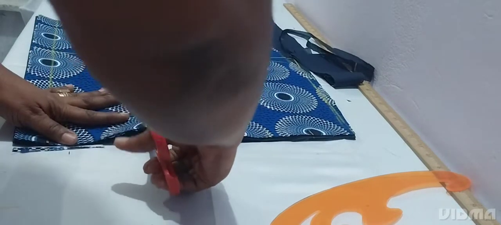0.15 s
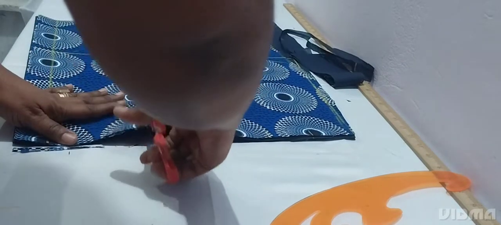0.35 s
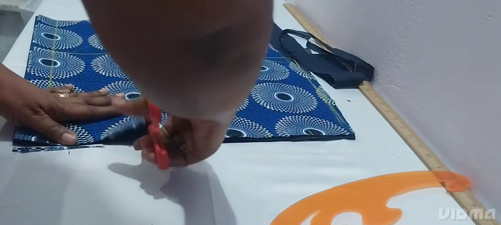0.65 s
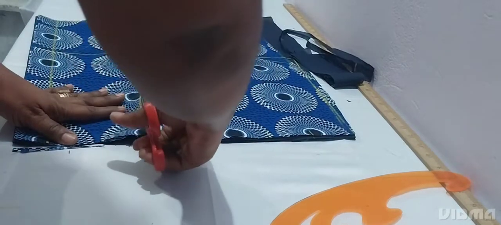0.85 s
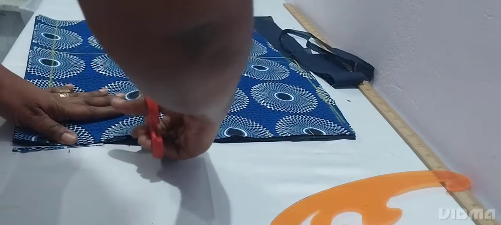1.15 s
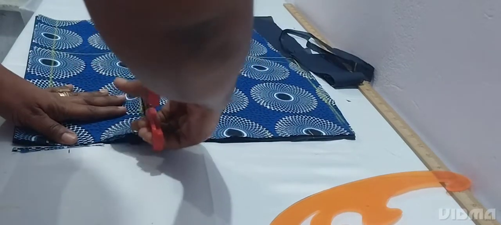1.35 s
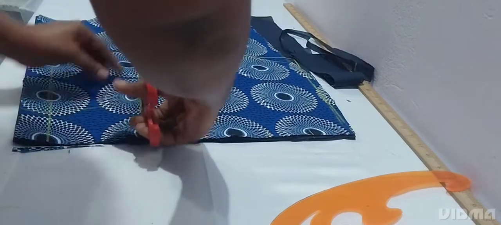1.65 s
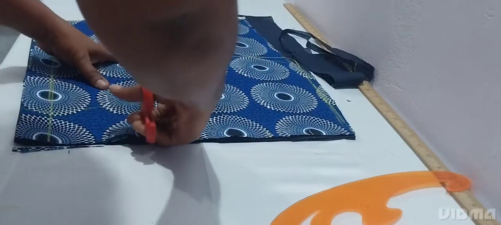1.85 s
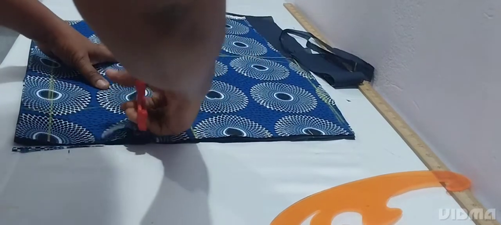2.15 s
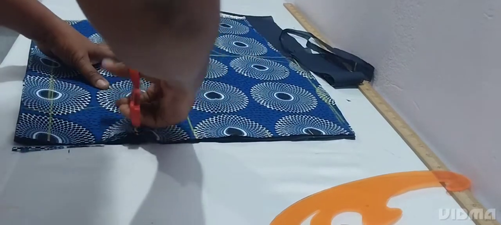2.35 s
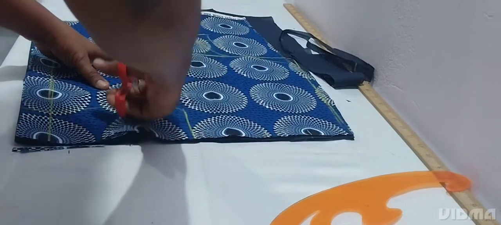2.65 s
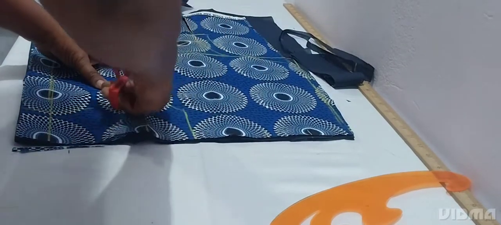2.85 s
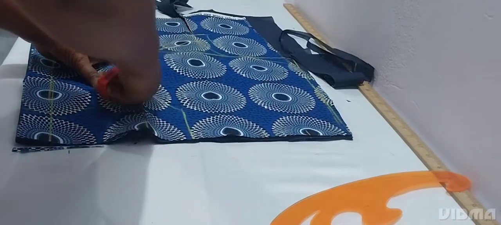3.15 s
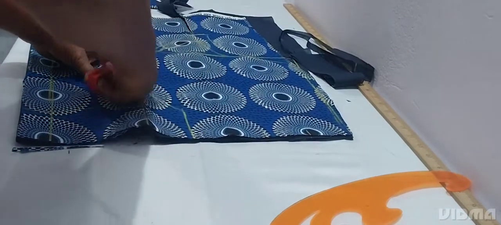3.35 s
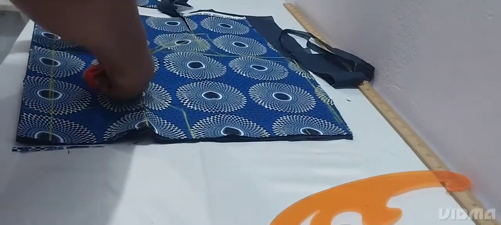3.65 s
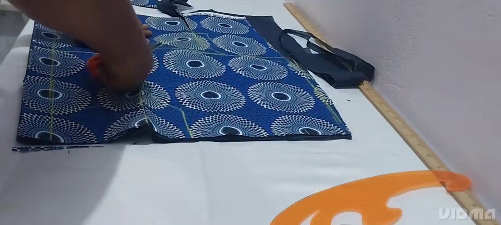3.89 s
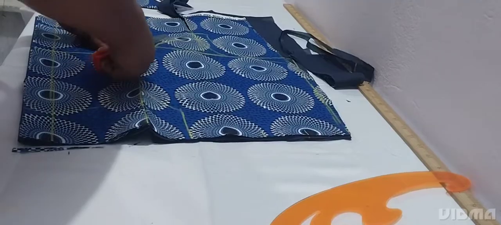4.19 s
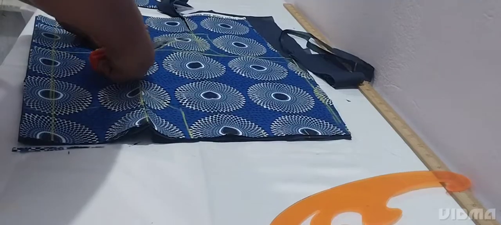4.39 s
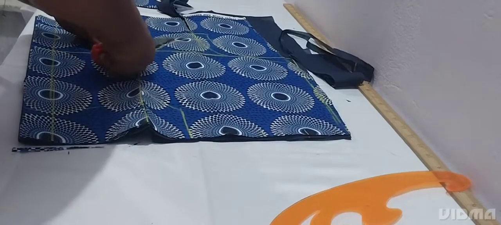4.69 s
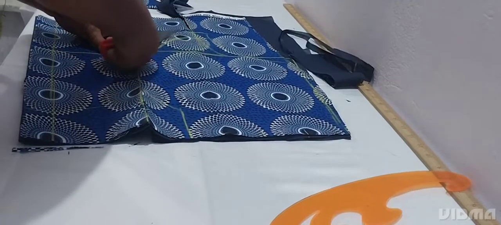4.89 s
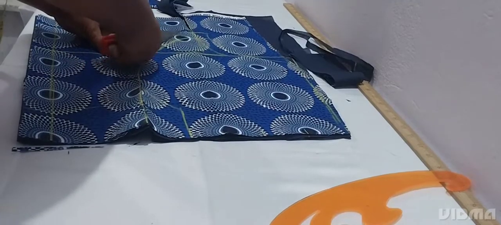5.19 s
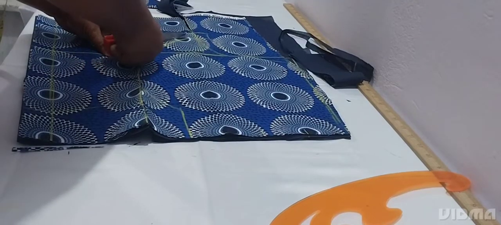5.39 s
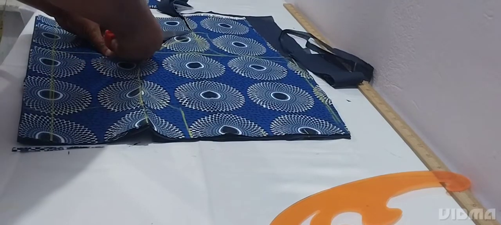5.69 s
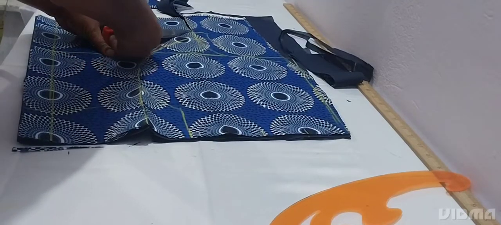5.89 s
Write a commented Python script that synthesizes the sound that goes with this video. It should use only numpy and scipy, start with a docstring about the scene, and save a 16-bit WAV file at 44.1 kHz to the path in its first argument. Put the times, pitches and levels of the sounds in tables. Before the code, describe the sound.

A cut is already closing at 0 s, then large scissors keep snipping through layered cotton roughly every 0.35 seconds, eighteen strokes up to about 5.9 s. Each lasts well under a tenth of a second: a dense crackle of snapping threads, a metallic rasp, and a hollow wooden rattle from the table under the lower blade. Many end in a hard steel clack, doubled around 0.67, 1.0 and 2.02 s. Low soft thuds of the hand and a deeper table wobble sit beneath. Between cuts, the opening blades scrape briefly forward, broader and hissier at first, narrower and duller after about 2 s, with a tiny extra slip near 5.1 s. From about 5 s the low board resonance thins and the table rocks less. The sound is close, loud and punchy, with short room reflections, quiet low air and faint hiss rising at the end.

```python
"""Scissors cutting cloth on a table

Dressmaking scissors cut layered cotton, three snips a second, the lower blade resting on a hollow table.
Each stroke snaps a run of threads: click trains rattle the board's resonances and crunch at the blades.
The hand thuds on the top as a swinging deep mode; between strokes the opening scissors scrape softly forward.
Quiet noise gives the air of a small room; a close microphone feeds a fast limiter."""
import sys
import numpy as np
from scipy import signal
from scipy.fft import rfft, irfft
from scipy.io import wavfile
from scipy.ndimage import uniform_filter1d, minimum_filter1d

SR = 44100
rng = np.random.default_rng(int(sys.argv[2]) if len(sys.argv) > 2 else 0)


def put_to_file(sound):
    """Save the sound as 16-bit audio at rate SR, in the file named by the first command-line argument."""
    columns = np.atleast_2d(sound).T  # one column per channel
    safe = np.clip(columns, -1, 1)
    whole_steps = np.round(safe * 32767)
    wavfile.write(sys.argv[1], SR, whole_steps.astype(np.int16))


N = 266035
STROKE = int(SR / 2)  # samples in the buffer of one short sound
T = np.arange(STROKE) / SR  # s
LEAD = 0.04  # s of build-up ahead of a stroke or slide

# closing strokes: bite t/s, shut t/s, basic force change over the stroke/dB, strength/dB, blade note f/Hz,
# board's middle resonance before strength/dB, thud at the bite/dB, thud at the shut/dB, table rocking/dB
SNIPS = [(-.04, 0.006, 4.5, 0.5, 2500, -15, -41.5, -15, -33),
         (0.287, 0.363, -5.5, 0.5, 2590, -16.5, -15.5, -20.5, -25),
         (0.625, 0.68, -2.5, 0.5, 2410, -19, -24, -18, -28),
         (.965, 1.014, 2.5, 0, 1770, -18, -24, -18, -34.5),
         (1.305, 1.328, -6, 1, 2370, -11, -24, -13.5, -41),
         (1.644, 1.686, -2, 2, 2140, -21.5, -31, -14.5, -24),
         (1.984, 2.03, 4.5, -1, 2860, -15, -12.5, -10, -23.5),
         (2.336, 2.407, -11, -2, 2350, -12, -12.5, -16, -27.5),
         (2.677, 2.731, 0.5, 1, 2380, -15, -11.5, -24, -33),
         (3.027, 3.066, 4, 0, 2790, -16, -19.5, -15, -30),
         (3.36, 3.416, -4.5, .5, 2330, -15.5, -12.5, -24, -27),
         (3.713, 3.778, -6, -1.5, 3130, -15, -14.5, -28.5, -31),
         (4.055, 4.115, -7.5, -.5, 1955, -15, -16, -21.5, -39),
         (4.411, 4.479, -5, -1, 3100, -12, -17, -22, -28.5),
         (4.772, 4.835, -9.5, 1, 1960, -12.5, -18.5, -15, -34),
         (5.122, 5.182, -1, 2, 1920, -9, -32.5, -22, -43),
         (5.48, 5.523, -8.5, 1, 2310, -7, -22, -23.5, -47),
         (5.812, 5.881, -2.5, -3, 2230, -10, -33, -25.5, -52)]
# tone of the blades rubbing through cloth: f/Hz, gain/dB
RASP = [(900, -5), (1400, 4.5), (1680, -2), (2100, 2.5), (2600, -2.5), (3300, -6.5), (4000, -15),
        (4600, -20), (7000, -32.5)]
# tone of the crisp fibres at the edge: f/Hz, gain/dB
CRUNCH = [(3000, -49), (4600, -17.5), (5400, 4), (6700, -1), (7800, -12.5), (8800, -15.5), (10000, -30.5),
          (16000, -34.5)]
# tone of the sizzling edges: f/Hz, gain/dB
SIZZLE = [(6000, -3.5), (9500, -8), (11000, -8), (12600, -8.5), (14000, -13.5), (16000, -5.5)]


def undb(db):
    """Decibels to gain."""
    return 10 ** (np.asarray(db) / 20)


def add(track, start, sound):
    """Mix a sound into the track at a time in seconds."""
    i = int(start * SR)
    a, b = max(i, 0), min(i + len(sound), N)
    track[a:b] += sound[a - i:b - i]


def along(curve, s):
    """The columns of a curve, interpolated at a time in seconds."""
    times, *columns = np.transpose(curve)
    return [np.interp(s, times, column) for column in columns]


def level(x, db, seconds):
    """Give x the energy of a sound that holds this level for so many seconds."""
    return x * undb(db) * np.sqrt(seconds * SR / np.sum(x ** 2))


def resonate(x, hz, width, order=1):
    """Resonance with gain 1 at its centre; a higher order has steeper skirts."""
    low = np.hypot(hz, width / 2) - width / 2
    band = signal.butter(order, [low, low + width], "bandpass", fs=SR, output="sos")
    return signal.sosfilt(band, x)


def colour(x, points):
    """Causal minimum-phase filter through (Hz, dB) points, built by folding the cepstrum."""
    size = 4096
    hz, db = np.transpose(points)
    bins = np.fft.rfftfreq(size, 1 / SR) + 1
    log_gain = np.log(undb(np.interp(np.log(bins), np.log(hz), db)))
    cepstrum = irfft(log_gain)[:size // 2]
    cepstrum[1:] *= 2
    impulse = irfft(np.exp(rfft(cepstrum, size)))
    return signal.fftconvolve(x, impulse)[:len(x)]


def linger(x, t60, tail_db):
    """The direct sound and a dense tail of table and wall reflections, drawn anew for every sound."""
    decay = np.exp(-np.log(1000) * T / t60)
    tail = rng.standard_normal(STROKE) * decay * (1 - np.exp(-T / 0.00068))
    return x + undb(tail_db) * signal.fftconvolve(x, tail / np.linalg.norm(tail))[:len(x)]


def ring(x):
    """Narrow modes of the board and the steel sing on top of the broad response."""
    # modes: f/Hz, width/Hz, gain/dB
    modes = [(207.5, 65, 12.5), (321.6, 24, 12), (375.4, 14.4, 5), (525, 44, -9), (704, 65, -2),
             (1002, 11, 0), (1140, 12, -36.5), (1913, 130, -6), (2310, 66, -7), (2870, 36, -32)]
    return x + sum(undb(db) * resonate(x, hz, width) for hz, width, db in modes)


def slips(rate, jitter, scatter_db):
    """A stick-slip train: clicks of uneven size, with a median spacing of 1 / rate seconds."""
    chance = rng.standard_normal((2000, 2))
    spacing = np.exp(jitter * chance[:, 0]) / rate
    at = (np.cumsum(spacing) * SR).astype(int)
    inside = at < STROKE
    return np.bincount(at[inside], undb(scatter_db * chance[inside, 1]), STROKE)


def tear(threads, seconds):
    """A thread parts fibre by fibre: each click becomes a brief swelling burst of noise."""
    t = T[:600] / seconds
    power = np.abs(signal.fftconvolve(threads ** 2, t ** 2 * np.exp(-t))[:STROKE])
    return np.sqrt(power) * rng.standard_normal(STROKE)


def press(lead, length, change_db, rise, fall):
    """Force of a stroke: builds up to the bite, changes along the blade, lets go; times in s."""
    t = T - lead
    closed = np.clip(t / length, 0, 1)
    build_up = np.minimum(t, 0) / rise
    let_go = np.maximum(t - length, 0) / fall
    return undb(change_db * closed) * np.exp(build_up - let_go)


def travel(x, step, ring_s):
    """The crossing point runs along the blades: at every step it meets other short resonances of the steel."""
    count = 10
    steel = rng.standard_normal((count, 256)) * np.exp(-T[:256] / ring_s)
    steel /= np.linalg.norm(steel, axis=1, keepdims=True)
    span = int(step * SR)
    out = np.zeros(2 * STROKE)
    for k in range(count):
        # overlapping windows crossfade from one place to the next
        window = np.hanning(2 * span)
        piece = np.convolve(x[k * span:(k + 2) * span] * window, steel[k])
        out[k * span:k * span + len(piece)] += piece
    return out[:STROKE]


def room_air():
    """The quiet air of the room: steady noise, strongest in the bass."""
    # tone of the air: f/Hz, gain/dB
    air_tone = [(20, -31.5), (50, 3), (110, 2), (250, 3), (700, -23), (1300, -10), (2200, -28.5),
                (4500, -38), (6300, -41.5), (10000, -39), (15000, -49)]
    return level(colour(rng.standard_normal(N), air_tone), -48, N / SR)


def hiss():
    """A faint band of low-treble noise that slowly swells and sinks."""
    # hiss level over time: t/s, level/dB
    hiss_curve = [(0, -74), (1.3, -81), (1.6, -75), (4.6, -77), (5.05, -73), (5.45, -71.5), (6.03, -65)]
    band = resonate(rng.standard_normal(N), 3110, 760, order=3)
    return band / band.std() * undb(along(hiss_curve, np.arange(N) / SR)[0])


def walls(x, t60, db):
    """The small room answers with a slowly building, decaying noise tail, limited to the middle range."""
    answer = rng.standard_normal(STROKE) * np.exp(-np.log(1000) * T / t60) * (1 - np.exp(-T / 0.054))
    answer = resonate(answer / np.linalg.norm(answer), 1820, 1900)
    return undb(db) * signal.fftconvolve(x, answer)[:N]


def rustle():
    """After each cut the parted cloth settles: torn click grains in a narrow band, fading away."""
    settle_hz, settle_width_hz, settle_db, settle_s = 1910, 380, -40.5, 0.041
    out = np.zeros(N)
    for bite, shut, change_db, db, *_ in SNIPS:
        grains = tear(slips(rate=400, jitter=0.39, scatter_db=3.5), 0.0006)
        grains = resonate(grains, settle_hz, settle_width_hz, order=2)
        add(out, shut, undb(settle_db + db) * grains / grains.std() * np.exp(-T / settle_s))
    return out


def thumps(blows, swell, t60, rumble_db):
    """Soft pushes swing one deep mode of the table; its neighbours rumble on."""
    out = np.zeros(N)
    for s, db, hz in blows:
        fade = (1 - np.exp(-(T / swell) ** 2)) * np.exp(-np.log(1000) * T / t60)
        swing = np.sin(2 * np.pi * hz * T) * fade / fade.max()
        rumble = resonate(rng.standard_normal(STROKE), hz * 1.3, hz * 0.9, order=3)
        rumble = rumble / rumble.std() * (1 - np.exp(-T / swell)) * np.exp(-T / 0.031)
        add(out, s, undb(db) * (swing + undb(rumble_db) * rumble))
    return out


def table():
    """The hand thuds on the top around bite and shut; the arm's weight rocks the whole table."""
    thud_hz, thud_ahead_s = 113.5, 0.0159  # the hand lands just before the bite, and again at the shut
    rock_hz, rock_ahead_s = 48.1, 0.0153  # the rocking comes towards the end of a stroke
    thuds, rocks = [], []
    for bite, shut, *_, bite_db, shut_db, rock_db in SNIPS:
        thuds += [(bite - thud_ahead_s, bite_db, thud_hz), (shut, shut_db, thud_hz)]
        rocks += [(shut - rock_ahead_s, rock_db, rock_hz)]
    thudding = thumps(thuds, swell=0.011, t60=0.17, rumble_db=-3.5)
    return thudding + thumps(rocks, swell=0.0045, t60=0.44, rumble_db=12)


def slide(length, db, hz, width, hiss_db):
    """The blade's back rubs over the board in stick-slip bursts while cloth brushes the steel."""
    # tone of cloth brushing the steel: f/Hz, gain/dB
    brush_tone = [(600, 0), (1400, 5), (2400, -4), (4400, -9), (5600, -1.5), (6800, -3), (8000, -22),
                  (10000, -18), (14000, -25.5)]
    steel_hz, steel_width_hz, steel_db = 1990, 260, -35.5  # faint ring, level relative to the scrape
    force = press(LEAD, length, -0.54, rise=0.011, fall=0.0093)
    friction = tear(slips(rate=520, jitter=0.6, scatter_db=3.5), 0.00028) * force
    stutter = ring(linger(friction, t60=0.086, tail_db=3.5))
    rubbing = resonate(resonate(stutter, hz, width, order=2), 410, 880, order=3)
    scrape = level(rubbing, db, length)
    brush = rng.standard_normal(STROKE) * press(LEAD + 0.01, length, 1.5, rise=0.025, fall=0.045)
    steel = level(resonate(brush, steel_hz, steel_width_hz, order=2), db + steel_db, length)
    return scrape + steel + level(colour(brush, brush_tone), hiss_db, length)


def opening():
    """The scissors open and are pushed on along the cut, then slip a little further just before each bite."""
    # slides of the opening scissors: start t/s, length t/s, level/dB
    slides = [(0.148, 0.052, -26.5), (0.479, .063, -25.5), (.828, .04, -24), (1.178, 0.031, -24.5),
              (1.518, 0.026, -31), (1.835, 0.056, -24.5), (2.193, 0.014, -21.5), (2.531, 0.024, -26),
              (2.898, 0.029, -28.5), (3.234, 0.033, -31.5), (3.574, 0.037, -32), (3.916, 0.036, -29),
              (4.283, 0.037, -28), (4.643, 0.048, -30), (5, 0.029, -23.5), (5.089, 0.0037, -18.5),
              (5.359, 0.024, -26), (5.705, 0.024, -26)]
    # scrape, broad and hissy near the table's edge, narrow further in:
    # t/s, centre f/Hz, width/Hz, cloth hiss level/dB
    scrape_curve = [(.5, 663, 475, -58), (1.2, 610, 318, -53.5), (1.85, 543, 302, -64),
                    (2.2, 682, 143, -60), (3.4, 584, 172, -69), (4.6, 678, 190, -67), (5.7, 662, 149, -69)]
    # the slips before the bite weaken as the cut goes on
    slip_ahead_s, slip_s, slip_db, slip_db_per_s = 0.018, 0.047, -26.5, -1.07
    nudges = [(bite - slip_ahead_s, slip_s, slip_db + slip_db_per_s * bite) for bite, *_ in SNIPS]
    out = np.zeros(N)
    for start, length, db in list(slides) + nudges:
        add(out, start - LEAD, slide(length, db, *along(scrape_curve, start)))
    return out


def clacks():
    """Steel meets steel through the last threads: a noise chatter of milliseconds and a knock in the board."""
    # sharp clacks of the blades: t/s, basic level before the crack and knock gains/dB
    clack_hits = [(.018, -26), (.659, -14.5), (.684, -14.5), (1.001, -16), (1.02, -15), (1.34, -12.5),
                  (1.7, -17), (1.749, -25.5), (2.017, -14.5), (2.032, -16.5), (2.403, -13), (3.068, -17.5),
                  (3.406, -26), (4.114, -15), (4.461, -15.5), (4.846, -20), (5.196, -15.5), (5.514, -15),
                  (5.839, -13)]
    out, t = np.zeros(N), T / 0.0024
    for s, db in clack_hits:
        chatter = rng.standard_normal(STROKE) * t ** 2 * np.exp(-t)
        contact = linger(chatter, t60=0.15, tail_db=-4.5)
        crack = colour(contact, CRUNCH)
        crack = crack + undb(-25.5) * colour(contact, SIZZLE) + undb(2) * colour(contact, RASP)
        knock = resonate(ring(contact), 836, 686, order=2)
        crack, knock = crack / np.abs(crack).max(), knock / np.abs(knock).max()
        add(out, s - 0.004, undb(db) * (undb(-7.0) * crack + undb(6.0) * knock))
    return out


def board_rattle(threads, length, change_db, low, middle, upper):
    """The lower blade passes each thread's jolt to the board's three broad resonances, each (Hz, dB)."""
    jolts = threads * press(LEAD, length, change_db - 2.0, rise=0.0057, fall=0.0049)
    board = ring(linger(jolts, t60=0.19, tail_db=1.1))
    low_band = level(resonate(board, low[0], 206, order=2), low[1], length)
    middle_band = level(resonate(board, middle[0], 264, order=3), middle[1], length)
    upper_band = level(resonate(board, upper[0], 241, order=3), upper[1], length)
    return low_band + middle_band + upper_band


def blade_rasp(fibres, free, length, change_db, blade_hz, db):
    """Shearing fibres rasp along the blades, whose own note and overtone sing at the bite."""
    force = press(LEAD, length, change_db + 0.33, rise=0.0069, fall=0.011)
    shear = travel(fibres * force, step=0.01337, ring_s=0.00086)
    note = undb(8.5) * resonate(free, blade_hz, 190, order=2)
    note = note + undb(-8.5) * resonate(free, min(blade_hz * 1.86, 3900), 630, order=3)
    rasp = colour(shear, RASP) + undb(-3.0) * note
    return level(ring(linger(rasp, t60=0.19, tail_db=11.5)), db, length)


def fibre_crunch(gripped, length, db):
    """Fibres crackle at the edge, louder as the crossing point runs towards the tips."""
    force = press(LEAD, length, 1.8, rise=0.012, fall=0.0071)
    crackle = travel(gripped * force, step=0.01343, ring_s=0.00039)
    return level(colour(linger(crackle, t60=0.23, tail_db=-4.5), CRUNCH), db, length)


def edge_sizzle(gripped, free, length, blade_hz, sizzle_hz, db):
    """The fine edges sizzle in a high band, with a high overtone of the blade at the bite."""
    force = press(LEAD, length, 1.5, rise=0.013, fall=0.003)
    edges = travel(gripped * force, step=0.0081, ring_s=0.00058)
    edges = edges + undb(7.5) * resonate(free, blade_hz * 4.39, 1300, order=2)
    edges = resonate(edges, sizzle_hz, 3400)
    return level(colour(linger(edges, t60=0.13, tail_db=-9.0), SIZZLE), db, length)


def snip(length, change_db, board, blade_hz, sizzle_hz, rasp_db, crunch_db, sizzle_db):
    """Threads snap one after another, jolting the board, while loose fibres shear at the edges."""
    threads = slips(rate=300, jitter=0.55, scatter_db=3.5)
    # between the snaps the edges shear loose fibres all the time
    fibres = tear(threads, 0.0007)
    fibres = fibres / fibres.std() + undb(-2) * rng.standard_normal(STROKE)
    # at the bite the blade is still free of the cloth
    free = fibres * press(LEAD - 0.002, length / 3, -0.68, rise=0.0041, fall=0.013)
    # the edges take hold gradually
    gripped = fibres * np.clip((T - LEAD + 0.025) / 0.055, 0, 1) ** 2
    rattle = board_rattle(threads, length, change_db, *board)
    rasp = blade_rasp(fibres, free, length, change_db, blade_hz, rasp_db)
    crunch = fibre_crunch(gripped, length, crunch_db)
    return rattle + rasp + crunch + edge_sizzle(gripped, free, length, blade_hz, sizzle_hz, sizzle_db)


def cutting():
    """The run of snips: the board's tone follows the place of the scissors, and the sizzle rises up the cloth."""
    # board response as the cut moves up the table, levels before strength:
    # t/s, low resonance level/dB, middle f/Hz, upper f/Hz, upper level/dB
    board_curve = [(.25, -17.5, 673, 1030, -12), (1.1, -17, 670, 1127, -20.5),
                   (2.1, -15.5, 710, 1142, -14.5), (3, -15, 650, 1063, -13.5),
                   (3.45, -14.5, 536, 1012, -12.5), (4.05, -14, 575, 1019, -12),
                   (4.45, -17, 710, 964, -11.5), (5.15, -25, 692, 850, -14.5), (5.8, -21, 737, 830, -23)]
    low_to_upper = 0.32  # the low resonance moves with the upper one, at this ratio
    # the blades' sound changes steadily along the cut: value at 0 s before strength, change per s
    rasp_0_db, rasp_db_per_s = -25, -0.5
    crunch_0_db, crunch_db_per_s = -38.5, -0.78
    sizzle_0_db, sizzle_db_per_s = -54, 0.5
    sizzle_0_hz, sizzle_hz_per_s = 10600, 710
    out = np.zeros(N)
    for bite, shut, change_db, db, blade_hz, middle_db, *_ in SNIPS:
        low_db, middle_hz, upper_hz, upper_db = along(board_curve, bite)
        low = low_to_upper * upper_hz, db + low_db
        board = low, (middle_hz, db + middle_db), (upper_hz, db + upper_db)
        rasp_db = db + rasp_0_db + rasp_db_per_s * bite
        crunch_db = db + crunch_0_db + crunch_db_per_s * bite
        sizzle_db = db + sizzle_0_db + sizzle_db_per_s * bite
        sizzle_hz = sizzle_0_hz + sizzle_hz_per_s * bite
        stroke = snip(shut - bite, change_db, board, blade_hz, sizzle_hz, rasp_db, crunch_db, sizzle_db)
        add(out, bite - LEAD, stroke)
    return out


def scene():
    """Scissors, table, cloth and the quiet air of the room."""
    scissors = cutting() + opening() + clacks()
    background = room_air() + hiss() + walls(scissors, t60=0.24, db=-11.5)
    return (background + rustle() + table() + scissors)[None]


def record(dry):
    """The microphone sheds the deepest bass, a fast limiter holds the peaks near full scale, and the top is cut."""
    top_hz = 15450
    x = signal.sosfilt(signal.butter(3, 32, "highpass", fs=SR, output="sos"), dry)
    size = 129  # limiter window in samples
    gain = np.minimum(1, 0.98 / (np.abs(x) + 1e-9))
    # hold the lowest gain around each peak, then smooth it
    gain = uniform_filter1d(minimum_filter1d(gain, size), size)
    top_cut = signal.ellip(10, 0.1, 80, top_hz, fs=SR, output="sos")
    return signal.sosfilt(top_cut, x * gain)


dry = scene()
out = record(dry)
put_to_file(out)
```